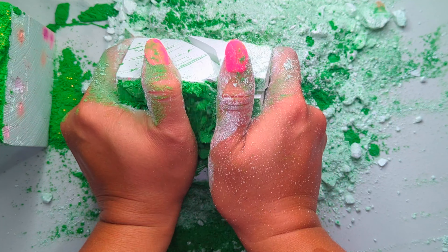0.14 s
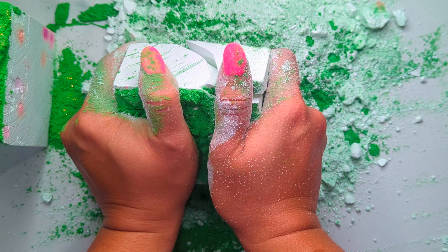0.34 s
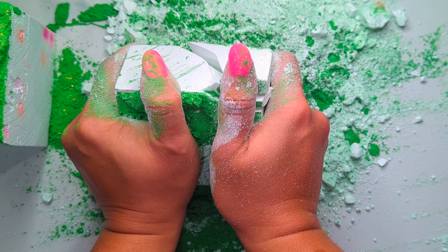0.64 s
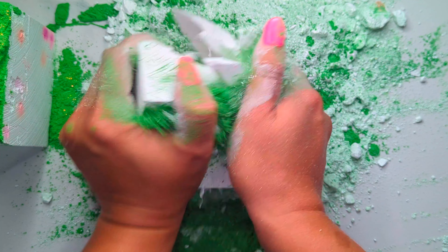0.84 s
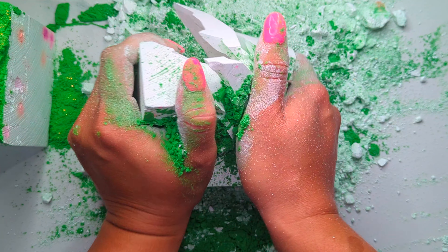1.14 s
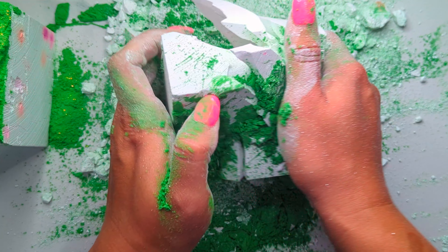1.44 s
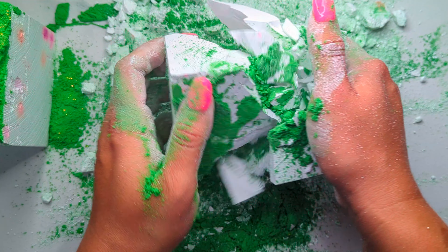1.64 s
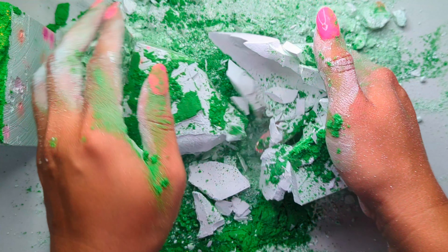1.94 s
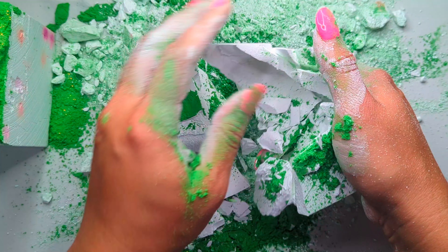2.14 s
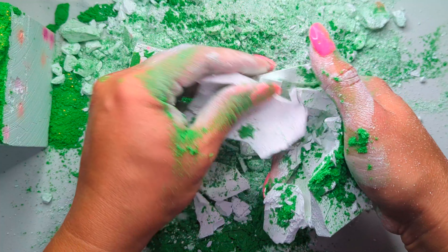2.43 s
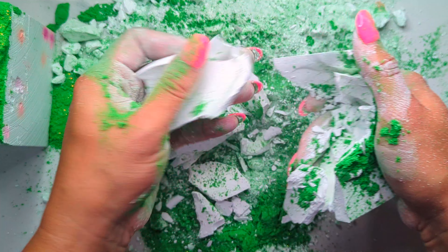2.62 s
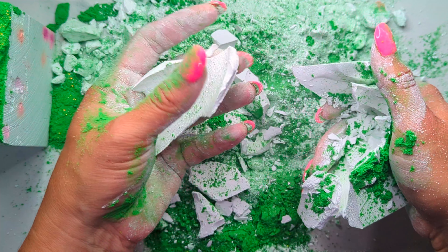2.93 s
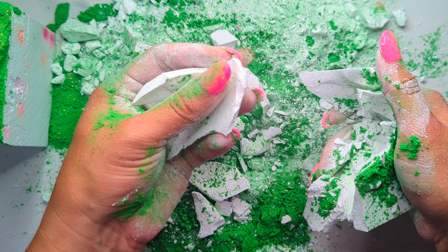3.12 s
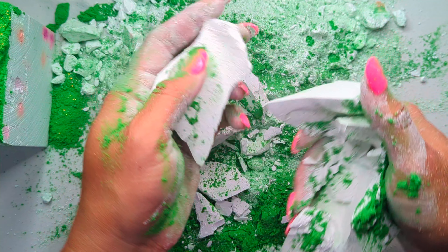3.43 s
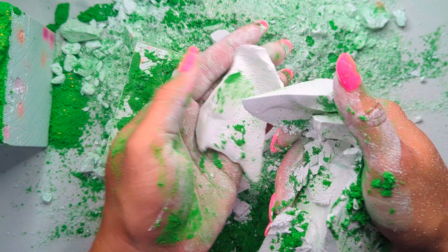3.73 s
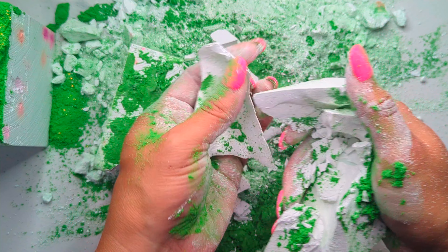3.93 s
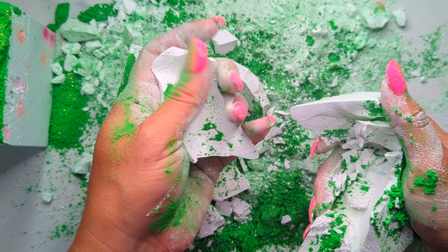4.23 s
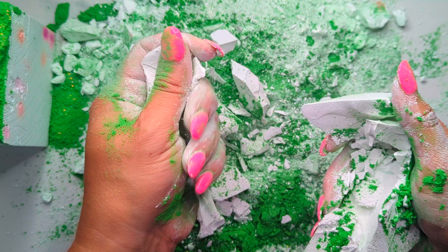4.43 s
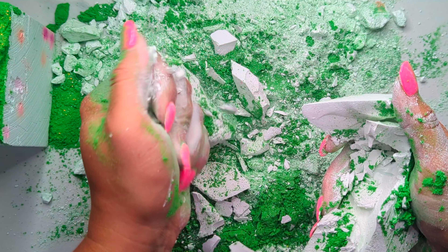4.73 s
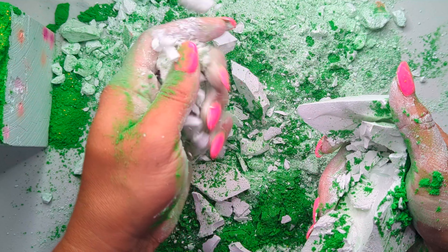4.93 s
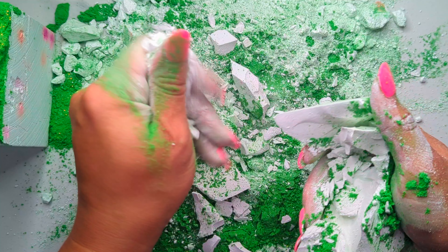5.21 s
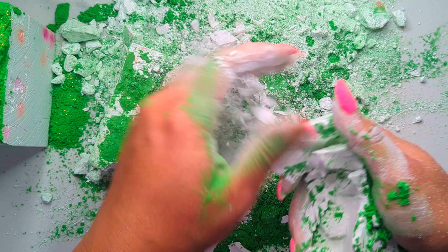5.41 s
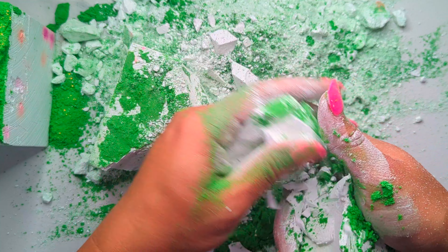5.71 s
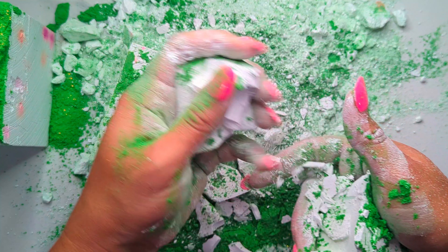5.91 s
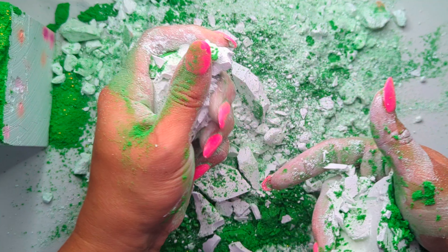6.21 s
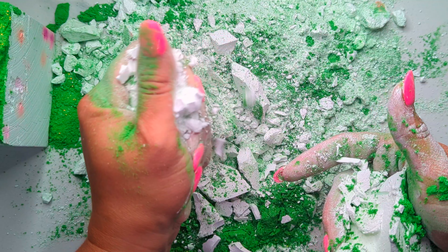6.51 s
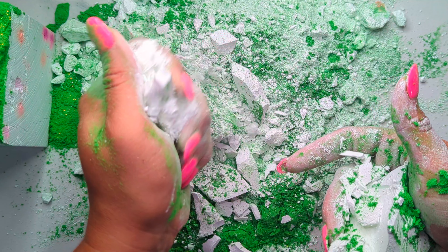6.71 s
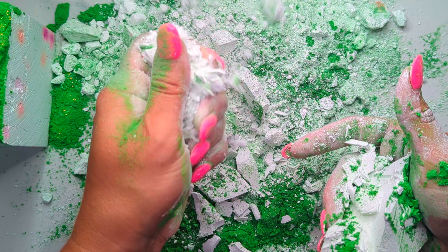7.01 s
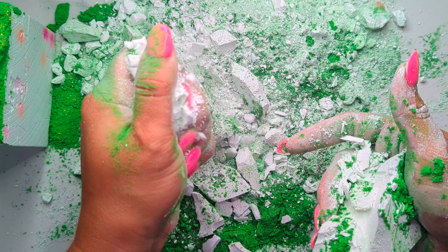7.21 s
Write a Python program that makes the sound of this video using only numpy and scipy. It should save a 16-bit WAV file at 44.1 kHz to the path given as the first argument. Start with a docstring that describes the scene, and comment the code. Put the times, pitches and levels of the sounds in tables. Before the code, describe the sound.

Three fractures of a chalky block open: a dry snap, a brighter one, then an overloaded boom-crack. Gritty dragging, clacks and crumbs follow, thinning to powdery strokes and small thumps. Loud brittle crunching breaks out as a piece is squeezed in the fist, shards clink and rattle, and a second, heavier crush crackles to the end. Close microphone, small room, low steady hum.

```python
"""A block of dry chalk is broken in two hands over a table, then crushed in one fist, very near a microphone.
Three long fractures snap it: each rings block and table, fills the small room and shoves the air.
Pieces crack or knock dully as short pitched noise bursts, crumbs grind as clicks, and dust rubs as soft hiss.
The half block drags on the table, lumps thump and shards clink as damped tones, over room air and a fan hum.
The loud cracks overload the microphone, so its input clips hard."""
import sys
import numpy as np
from scipy import signal
from scipy.fft import rfft, irfft
from scipy.io import wavfile

SR = 44100
rng = np.random.default_rng(int(sys.argv[2]) if len(sys.argv) > 2 else 0)


def pcm_store(signal):
    """Save signal as 16-bit PCM."""
    levels = np.round(np.clip(np.atleast_2d(signal), -1, 1) * 32767)
    wavfile.write(sys.argv[1], SR, levels.astype(np.int16).T)


N = 324135
TIME = np.arange(N) / SR
TAP_HZ = np.fft.rfftfreq(4096, 1 / SR)  # frequency grid of the colouring filters

# room air at the microphone, spectrum shape only: pitch_hz, gain_db
AIR_COLOUR = [(20, -6), (45, -9), (90, -12), (135, -12), (180, -19), (340, -18), (480, -26), (900, -30),
              (3000, -33), (7000, -37), (15500, -47)]
# a fan somewhere: pitch_hz, rms_level_db
FAN_HUM = [(119, -39.5), (173, -48.5), (217, -48), (356, -49)]
# the small room: pitch_hz, time_to_fall_60_db_s
ROOM_T60 = [(100, 0.6506), (600, 0.515), (2000, 0.5676), (5000, 0.46666), (9000, 0.42324), (15000, 0.2478)]

# pieces crack or knock dully on the table; more weight means more low end:
# start_s, level_db, decay_ms, pitch_hz, weight_db
CRACKS = [(0.149, -13, 2.022, 4875, -1), (0.4362, -22, 2.252, 1598, 7.5), (0.52, -18, 1.831, 1502, 19.5),
          (0.633, -20.5, 6.77, 2378, 7), (0.7864, -22.5, 6.486, 1717, 12.5), (1.1133, -7, 0.2876, 2305, -4),
          (1.5944, -19.5, 2.143, 2600, 15), (1.7255, -21.5, 1.404, 2201, -6),
          (1.8154, -16, 0.666, 1998, -6.5), (1.8324, -15, 8.835, 1997, 11), (1.8526, -9, 1.437, 2274, -14),
          (1.8921, -4, 2.162, 800, 6.5), (1.9039, -14.5, 7.17, 2276, 9), (1.991, -13.5, 1.295, 4862, -0.5),
          (2.0181, -17.5, 1.298, 2000, 4.5), (2.0312, -10.5, 0.7426, 4243, 1),
          (2.3874, -14.5, 5.013, 2760, 2), (2.4094, -16.5, 1.741, 3003, 1), (2.4486, -18.5, 2.904, 2200, 1),
          (2.5246, -11, 5.593, 3879, -0.5), (2.9378, -17, 1.255, 1363, 7.5),
          (2.976, -16.5, 0.6773, 2404, -14), (3.096, -13.5, 0.8562, 1300, 20),
          (3.1574, -14, 0.2938, 3805, -11.5), (4.071, -23.5, 3.078, 2982, -21),
          (4.2673, -14.5, 0.558, 5131, -1), (4.3774, -5, 3.216, 5031, -1),
          (4.411, -11.5, 0.846, 5908, -2.5), (4.4239, 4, 2.3295, 3140, -5), (4.4356, -2, 2.19, 3440, -0.5),
          (4.461, -2.5, 2.152, 3602, -9.5), (4.4678, 7, 2.07, 3799, -3.5), (4.4949, 2.5, 2.897, 4401, -12),
          (4.5262, -6.5, 1.89, 2603, -5), (4.5407, 1.5, 0.9355, 2366, -7), (4.6036, -12, 0.816, 1400, -6),
          (4.627, -0.5, 0.953, 3928, 1), (4.6301, -3.5, 1.512, 2351, -4.5),
          (4.6417, -10, 1.807, 2398, -5.5), (4.677, -5, 1.141, 3400, 0.5), (4.6834, -3.5, 1.062, 2471, 2.5),
          (4.6873, -4.5, 1.446, 3906, -1.5), (4.705, -3.5, 1.662, 3152, 1),
          (4.7295, -7.5, 0.7915, 3458, -13.5), (5.068, -17, 6.424, 4026, -4.5),
          (5.1544, -11.5, 5.874, 5065, 8.5), (5.16, -6, 0.561, 2697, -4.5), (5.191, -5, 0.7855, 2502, -5.5),
          (5.274, -8.5, 2.177, 3302, 6), (5.3078, -1, 0.4618, 2487, -12.5), (5.3128, -8, 2.017, 6140, 1.5),
          (5.354, -15.5, 3.573, 2746, 3), (5.4205, -19.5, 1.603, 3000, 25.5),
          (5.529, -6.5, 0.7, 1670, -11.5), (5.5477, -9, 1.879, 1886, -14), (6.0664, 2, 2.879, 3999, -4.5),
          (6.0985, -1, 1.834, 5690, -12), (6.1076, 4.5, 0.566, 2904, -2.5), (6.1115, 0, 3.02, 5457, -13.5),
          (6.1285, 1.5, 4.103, 4224, -0.5), (6.151, -8.5, 0.611, 3800, -1), (6.155, 3, 1.7315, 2494, -9.5),
          (6.175, -5, 2.462, 7063, -20), (6.196, -1, 1.924, 3989, -9.5), (6.2232, -3.5, 2.466, 2085, -7),
          (6.2289, -5, 1.895, 3997, -6), (6.245, 3.5, 4.913, 4066, -5.5), (6.3222, -12, 0.623, 4500, -10),
          (6.3841, -2.5, 4.226, 6770, -3), (6.4009, 4, 3.167, 2965, -9), (6.413, -0.5, 0.589, 3694, -3.5),
          (6.4468, -0.5, 2.773, 2694, -0.5), (6.4562, -6, 1.113, 3403, -10.5),
          (6.4659, 1, 0.704, 4224, -15.5), (6.4758, -7.5, 3.278, 2700, 3.5), (6.4902, 7, 3.566, 2710, 1),
          (6.5014, 2, 1.739, 2394, 1), (6.6188, -8.5, 1.716, 1939, -11), (6.7586, -12.5, 0.4795, 2200, 19),
          (6.766, -16.5, 6.05, 2401, -12), (6.8556, -13.5, 1.422, 3515, 6),
          (6.9189, -13, 1.817, 2689, -3.5), (6.9911, -3.5, 1.7393, 1718, -1.5),
          (7.0732, 1, 0.3672, 2681, -4), (7.117, -1.5, 0.514, 3896, -10.5),
          (7.1364, -.5, 0.5785, 1801, -21), (7.148, -10, 1.246, 1800, -10.5),
          (7.1725, 4.5, 0.375, 2130, -8), (7.188, -10, 0.5076, 3300, -2),
          (7.2261, -5.5, 0.6765, 3905, -3.5), (7.239, -2, 0.51, 1998, 3.5), (7.258, -2, 1.809, 4360, 2.5),
          (7.3163, -12, 0.8296, 2299, -7)]
# a cracking or knocking piece before its own pitch is added: pitch_hz, gain_db
CRACK_COLOUR = [(60, -21.5), (250, 1), (600, 0.5), (1200, -3), (2600, -3), (5000, -5.5), (7000, -0.5),
                (10000, -4), (16000, -15)]
# the whole block snaps: start_s, level_db, decay_ms, treble_lift_db, room_level_db, air_push_peak_db
SNAPS = [(0.1621, 8, 7.877, 1.5, -12.5, -6.5), (0.5751, 5, 5.628, 19, -21, -15.5),
         (0.8943, 20.5, 16, 4, -2.5, 3)]
# the snapping block before its modes are added: pitch_hz, gain_db
SNAP_COLOUR = [(40, -10), (140, -3), (240, -4.5), (380, -3), (600, -4), (1000, -5), (1800, -8),
               (3200, -14.5), (7000, -18), (11000, -23.5), (16000, -44)]
# what block and table ring with: pitch_hz, width_hz, gain_db
BLOCK_MODES = [(364, 35, -1), (475, 30, -4), (543, 25, 2), (620, 32, 2), (750, 25, -2), (806, 25, -2),
               (1050, 80, -6), (3030, 160, -2), (3700, 250, -5)]
# the half block dragged over the table, before the drag trim: time_s, level_db
DRAG_EFFORT = [(1.2, -49), (1.236, -45), (1.376, -33), (1.406, -41.5), (1.582, -40.5), (1.596, -31),
               (1.688, -39.5), (1.8, -37.5)]
# modes of the dragged half block: pitch_hz, width_hz, gain_db
DRAG_MODES = [(2344.5, 133.2, 3), (3382, 256, 0), (3841.5, 312.8, 3.5), (5513, 266, -4), (6423.3, 351.6, 0),
              (8517, 107.6, -0.5)]
# soft low thumps of lumps against palm or table, some beneath a crack:
# start_s, push_peak_db, nominal_pitch_hz (thump() lowers it)
THUMPS = [(1.488, -19.5, 118.1), (1.517, -17.5, 100.1), (1.722, -20.5, 119.7), (1.907, -14.5, 89),
          (1.943, -14.5, 99.9), (1.965, -14, 117.7), (2.326, -18, 107.9), (2.391, -10, 204.5),
          (2.832, -20, 78), (3.096, -18.5, 109.1), (3.118, -15, 143.4), (3.281, -19, 110),
          (3.499, -14.5, 98.41), (3.647, -18.5, 88), (3.807, -14.5, 191), (3.914, -19.5, 90.03),
          (3.978, -18.5, 150), (4.759, -18.5, 104.8), (4.938, -13.5, 151), (5.158, -10.5, 158.3),
          (5.295, -14, 121.3), (6.135, -10, 191.3), (6.916, -12, 165), (7.149, -16.5, 192.4)]
# crumbs pressed in the fist, one curve a squeeze, before the grit and powder trims: time_s, level_db
SQUEEZES = [
    [(1.76, -33), (1.866, -30), (1.942, -35), (2.066, -39), (2.14, -45.5)],
    [(4.38, -24), (4.44, -32), (4.552, -37), (4.604, -28), (4.83, -31.5), (4.98, -35)],
    [(5.0, -28), (5.08, -32), (5.386, -34), (5.45, -33), (5.61, -35.5), (5.72, -46.5)],
    [(6.07, -44.5), (6.118, -46.5), (6.238, -35), (6.298, -26), (6.456, -23.5), (6.564, -29.5),
     (6.7, -36.5)],
    [(6.72, -29), (6.816, -35), (7.084, -28.5), (7.35, -33.5)],
]
# ground crumbs: pitch_hz, gain_db
GRIT_COLOUR = [(150, -9.5), (500, 1), (1200, -6.5), (2700, -2.5), (4000, -6.5), (6500, -5.5), (10000, -8.5),
               (16000, -17)]
# fine powder: pitch_hz, gain_db
POWDER_COLOUR = [(200, 2.5), (1200, -7.5), (3000, 2.5), (5200, 1), (6700, 5.5), (9000, -2), (13000, -1),
                 (16000, -20)]
# dusty skin slides over chalk: middle_s, half_length_s, level_db (before the rub trim), coarseness_db
RUBS = [(2.284, 0.0114, -35, 1.5), (2.361, 0.02907, -34, 7), (2.506, 0.022, -33.5, 2),
        (2.736, 0.04084, -37, 2.5), (3.14, 0.0907, -42, -3.5), (3.311, 0.02775, -27.5, -2.5),
        (3.388, 0.05669, -32.5, -4), (3.506, 0.00763, -40, -1.5), (3.595, 0.01105, -36, -5),
        (3.672, 0.01367, -31.5, 0.5), (3.824, 0.07544, -42, -2.5), (3.957, 0.04706, -33.5, 6.5),
        (4.085, 0.03673, -39.5, 1), (4.209, 0.05847, -33.5, 1.5), (4.825, 0.05387, -31.5, 0.5),
        (5.392, 0.01796, -37, -22), (5.716, 0.01914, -40, -4), (5.85, 0.02131, -36, 4),
        (5.97, 0.05988, -40, 5.5), (7.092, 0.052, -34.5, 11)]
# shards knock together: start_s, level_db, rattle_decay_ms, brightness_db_per_octave
CLINKS = [(2.4611, -14.5, 4.423, 0), (2.4663, -6.5, 2.689, 7.5), (2.476, -15.5, 5.61, 0),
          (2.536, -18.5, 5.04, 3.5), (2.572, -30, 2.03, 2.5), (3.67, -29.5, 11.51, 3),
          (5.2194, -28, 3.356, 6.5), (5.2386, -16.5, 1.295, 3.5), (5.3592, -21.5, 2.916, 4.5),
          (5.4421, -30.5, 6.23, 14.5), (5.459, -18.5, 1.326, -11), (5.472, -6, 0.811, -0.5),
          (5.4915, -22, 3.576, 7.5), (5.5196, -13.5, 3, -2.5), (5.557, -17, 1.506, -6),
          (5.5926, -7, 1.714, -5), (5.888, -21, 4.24, -0.5)]
# nominal modes of a flat shard, before each shard's own detuning: pitch_hz
SHARD_HZ = [2480, 3080, 3300, 4750, 6540, 8280]
# one row for each shard mode, before tilt and scatter: level_db, time_to_fall_60_db_s
SHARD_RING = [(-21, 0.01737), (2.5, 0.02157), (-16.5, 0.0128), (-6.5, 0.04098), (-12.5, 0.0349),
              (-8.5, 0.03605)]
# the two shards rattle: pitch_hz, gain_db
RATTLE_COLOUR = [(300, -4), (1300, -3.5), (2800, 7), (4000, -9), (6000, 3.5), (8400, -5), (10000, -8),
                 (16000, -38)]

CRACK_RING_DB, CRACK_RING_OCTAVES = 5.5, 0.9603  # the broad peak at a piece's own pitch
EDGE_DB, EDGE_DB_PER_OCTAVE, MIDDLE_PIECE_HZ = -10, 10, 3176  # higher-pitched pieces have a sharper edge
SPRAY_DB, SPRAY_STRETCH = -12.5, 2.9616  # crumbs that fly off: level, and how many times longer they last
# the low bump beneath each crack or knock; its nominal pitch is lowered in thump()
BUMP_DB, BUMP_NOMINAL_HZ = -12.5, 126.97
BUMP_PER_WEIGHT, FULL_WEIGHT_DB, BUMP_DB_PER_TENFOLD_DECAY = 0.6935, 9.5, 11.5

BLOCK_RING_DB, BLOCK_T60_S = -7.5, 0.3255  # the ring after a snap, relative to its room level
FLYING_DUST_DB = -27  # powder that sprays from a snap and hisses in its tail
SWAY_HZ = 11.5  # the microphone on its stand

CHIP_LAG_S, CHIP_DROP_DB = .024, -17.5  # a chip follows each crack: longest lag, level relative to the crack
FALLING_CHIPS, FALL_S, FALL_DB = 3, (.03, .12), -21  # chips after each snap: count, earliest and latest, level
CHIPS_PER_S, CHIP_OVER_GRIT_DB = 22, 13.5  # chips while the fist presses, relative to the squeeze curve
CHIP_HZ, CHIP_SPREAD_OCTAVES = 2825, 0.6096  # middle pitch and its scatter either way
CHIP_DECAY_MS, CHIP_SPREAD_DB = 0.7852, 3  # middle decay (scattered an octave), level scatter either way
CHIP_RING_DB, CHIP_RING_OCTAVES = 9.5, 0.5408  # a chip's pitch is clearer than a big piece's

DRAG_TRIM_DB, DRAG_RELEASE_DB_PER_S = 1.5, 62  # it slides on and comes to rest
GRIP_DB_PER_S, LET_GO_DB_PER_S = 6000, 180  # how fast a squeeze takes hold and lets go
GRIT_DB, SQUEEZED_POWDER_DB = -2, -13  # grit and powder hiss both follow the pressure
SHARD_DETUNE = .011  # no two shards ring alike (rms fraction of pitch)
EDGE_HZ = 16100  # upper band limit


def amp(db):
    """Turns dB into gain."""
    return 10 ** (np.asarray(db) / 20)


def unit(x):
    """Scales to rms 1."""
    return x / np.sqrt(np.mean(x ** 2) + 1e-20)


def read(points, hz):
    """Reads a (pitch_hz, value) table on a log-frequency axis."""
    f, value = np.transpose(points)
    return np.interp(np.log(hz + 1), np.log(f + 1), value)


def add(mix, start_s, sound):
    """Lays a sound into the mix in place, cut off at the end."""
    part = mix[max(round(start_s * SR), 0):][:len(sound)]
    part += sound[:len(part)]


def colour(x, gain_db):
    """Causal minimum-phase filter (gain on TAP_HZ) that keeps the power of white noise."""
    log_gain = np.log(amp(np.r_[gain_db, gain_db[-2:0:-1]]))
    spectrum = np.exp(np.conj(signal.hilbert(log_gain)))
    taps = np.fft.ifft(spectrum).real[:len(gain_db)]
    return signal.fftconvolve(x, taps / np.linalg.norm(taps))[:len(x)]


def shelf(corner_hz):
    """Rises on TAP_HZ from 0 below the corner to 1 above it."""
    return 1 / (1 + (corner_hz / (TAP_HZ + 1)) ** 4)


def resonances(modes):
    """Summed gain of (pitch_hz, width_hz, gain_db) peaks on TAP_HZ."""
    return sum(amp(db) / (1 + (2 * (TAP_HZ - hz) / width_hz) ** 2) for hz, width_hz, db in modes)


def drift(cutoff_hz):
    """Slow random wander of rms 1: noise under a Gaussian low-pass."""
    spectrum = rfft(rng.standard_normal(N))
    hz = np.fft.rfftfreq(N, 1 / SR)
    return unit(irfft(spectrum * np.exp(-(hz / cutoff_hz) ** 2), N))


def grains(per_s, spread_db):
    """Random clicks of rms 1, mostly small and a few large."""
    sizes = amp(spread_db * np.minimum(rng.exponential(1, N), 4.5))
    signs = rng.choice([-1, 1], N)
    return unit(sizes * signs * (rng.random(N) < per_s / SR))


def mottle(x, patchy_db):
    """Random patches of louder and softer colour in time and pitch keep the noise uneven; rms 1."""
    z = signal.stft(x, SR, nperseg=512)[2]
    patch_shape = np.outer(np.hanning(12), np.hanning(14))
    patches = signal.fftconvolve(rng.standard_normal(z.shape), patch_shape, "same")
    return unit(signal.istft(z * amp(patchy_db * unit(patches)), SR, nperseg=512)[1][:N])


def avalanche(decay_ms, gain_db, spread):
    """A fracture: tiny ruptures of uneven size that die away; it starts near rms 1."""
    t = np.arange(int(SR * (decay_ms / 125 + .01))) / SR
    fade = np.exp(-t * 1000 / decay_ms)
    held_chance = np.repeat(rng.standard_normal(len(t)), 16)[:len(t)]  # each size lasts 16 samples
    ruptures = rng.standard_normal(len(t)) * np.exp(spread * held_chance) * fade
    burst = colour(ruptures, gain_db)
    return burst * np.linalg.norm(fade) / np.linalg.norm(burst)


def push(hz, damping):
    """A shove of air, peak 1: a sharp front, then a heavily damped swing back."""
    turns = np.arange(int(4 * SR / hz)) * hz / SR
    front = 1 - np.exp(-turns / 0.10903)
    swing = np.cos(2 * np.pi * turns) * np.exp(-damping * turns) * front
    return swing / abs(swing).max()


def die_away(x):
    """Lets each band fade as it does in the room; the highest treble dies first."""
    hz, t, z = signal.stft(x, SR, nperseg=256)
    decay_db = -60 * t / read(ROOM_T60, hz)[:, None]
    return signal.istft(z * amp(decay_db), SR, nperseg=256)[1]


def room(x):
    """Sparse room reflections of random sign, the first after 4 ms."""
    signs = rng.choice([-1., 1.], SR)
    reflections = signs * (rng.random(SR) < .15) * (TIME[:SR] > .004)
    tail = die_away(reflections)
    return signal.fftconvolve(x, tail / np.linalg.norm(tail))[:N]


def fracture(db, decay_ms, hz, weight_db, peak_db, peak_octaves):
    """A piece cracks or knocks with its own pitch, and a short spray of crumbs follows."""
    ring_db = peak_db * np.exp(-(np.log2((TAP_HZ + 1) / hz) / peak_octaves) ** 2)
    low_db = weight_db * (1 - shelf(1079))
    edge_db = EDGE_DB + EDGE_DB_PER_OCTAVE * np.log2(hz / MIDDLE_PIECE_HZ)
    tone_db = read(CRACK_COLOUR, TAP_HZ) + ring_db + low_db + edge_db * shelf(6695.7)
    sound = amp(SPRAY_DB) * avalanche(SPRAY_STRETCH * decay_ms, tone_db, spread=0.9285)
    add(sound, 0, avalanche(decay_ms, tone_db, spread=0.1841))
    return amp(db) * sound


def thump(db, nominal_hz):
    """A soft knock: a damped push of air with a dull scuff of noise."""
    sound = np.zeros(SR // 4)
    add(sound, 0, push(nominal_hz * 0.75005, damping=2.841))
    scuff_db = -28 * shelf(418.84) - 14 * shelf(3485)
    add(sound, 0, amp(-5) * avalanche(6.394, scuff_db, spread=1.0))
    return amp(db) * sound


def pressure():
    """How hard the fist bears on the crumbs, as a gain: the strongest squeeze at each moment."""
    level_db = np.full(N, -100.)
    for rows in SQUEEZES:
        s, db = np.transpose(rows)
        grip_db = GRIP_DB_PER_S * np.maximum(s[0] - TIME, 0)
        let_go_db = LET_GO_DB_PER_S * np.maximum(TIME - s[-1], 0)
        level_db = np.maximum(level_db, np.interp(TIME, s, db) - grip_db - let_go_db)
    return amp(level_db)


def background():
    """Room air as coloured noise, and a fan hum of sines with wavering phase."""
    air = unit(colour(rng.standard_normal(N), read(AIR_COLOUR, TAP_HZ)))
    hum = np.zeros(N)
    for hz, db in FAN_HUM:
        phase = 2 * np.pi * hz * TIME + 1.0985 * drift(4.099)
        hum += amp(db) * np.sqrt(2) * np.sin(phase)
    return amp(-36.0) * air + hum


def cracks():
    """Pieces crack or knock dully on the table; heavier or longer ones carry a stronger low bump."""
    out = np.zeros(N)
    for s, db, decay_ms, hz, weight_db in CRACKS:
        add(out, s, fracture(db, decay_ms, hz, weight_db, CRACK_RING_DB, CRACK_RING_OCTAVES))
        weight_bump_db = BUMP_PER_WEIGHT * min(weight_db, FULL_WEIGHT_DB)
        length_bump_db = BUMP_DB_PER_TENFOLD_DECAY * np.log10(decay_ms / 2)
        add(out, s, thump(db + BUMP_DB + weight_bump_db + length_bump_db, BUMP_NOMINAL_HZ))
    return out


def chips():
    """Small chips come away by chance: after each crack or knock, after each snap, and as the fist presses."""
    out, pressure_db = np.zeros(N), 20 * np.log10(pressure())
    after = [(s + CHIP_LAG_S * rng.uniform(.2, 1), db + CHIP_DROP_DB) for s, db, *_ in CRACKS]
    fallen = [(s + rng.uniform(*FALL_S), FALL_DB) for s, *_ in SNAPS for _ in range(FALLING_CHIPS)]
    moments = np.flatnonzero(rng.random(N) < CHIPS_PER_S / SR)
    pressed = [(TIME[i], pressure_db[i] + CHIP_OVER_GRIT_DB) for i in moments]
    for s, db in after + fallen + pressed:
        strength, length, size = rng.uniform(-1, 1, 3)
        level_db = db + CHIP_SPREAD_DB * strength
        decay_ms = CHIP_DECAY_MS * 2 ** length
        hz = CHIP_HZ * 2 ** (CHIP_SPREAD_OCTAVES * size)
        add(out, s, fracture(level_db, decay_ms, hz, 1.406, CHIP_RING_DB, CHIP_RING_OCTAVES))
    return out


def snaps():
    """The block parts: a long fracture rings block and table, fills the room, and the halves shove the air."""
    out, t = np.zeros(N), TIME[:2 * SR]
    body_db = read(SNAP_COLOUR, TAP_HZ) + 20 * np.log10(1 + resonances(BLOCK_MODES))
    powder_db = read(POWDER_COLOUR, TAP_HZ)
    for s, db, decay_ms, lift_db, room_db, push_db in SNAPS:
        tone_db = body_db + lift_db * shelf(2556.3)
        add(out, s, amp(db) * avalanche(decay_ms, tone_db, spread=0.6113))

        debris = grains(per_s=12000, spread_db=2.6)[:SR]
        add(out, s, amp(room_db) * die_away(colour(debris, tone_db)))
        dust = grains(per_s=5100, spread_db=2)[:SR]
        add(out, s, amp(FLYING_DUST_DB) * die_away(colour(dust, powder_db)))

        ring = np.zeros(len(t))
        for hz, _, mode_db in BLOCK_MODES:
            if hz < 900:  # only the low modes last
                ring += amp(mode_db) * np.sin(2 * np.pi * (hz * t + rng.random()))
        ring_db = room_db + BLOCK_RING_DB - lift_db / 2
        add(out, s, amp(ring_db) * ring * np.exp(-np.log(1000) * t / BLOCK_T60_S))

        add(out, s + 1.85 * decay_ms / 1000, -amp(push_db) * push(61.17, damping=1.7325))
        sway = np.sin(2 * np.pi * SWAY_HZ * t) * np.exp(-t / 0.6045)
        add(out, s, amp(db / 2 - 25) * sway)  # the jolt leaves the microphone swaying
    return out


def dragging():
    """Grit under the sliding half block sticks and slips, as dense clicks, and sounds its modes."""
    modes = resonances(DRAG_MODES)
    tone_db = 20 * np.log10(amp(-7) + modes / modes.max()) - 7 * shelf(10000)
    scrape = mottle(colour(grains(per_s=9000, spread_db=2.6), tone_db), patchy_db=3.2)
    effort_db = np.interp(TIME, *np.transpose(DRAG_EFFORT), left=-100)
    release_db = DRAG_RELEASE_DB_PER_S * np.maximum(TIME - DRAG_EFFORT[-1][0], 0)
    return amp(DRAG_TRIM_DB + effort_db - release_db + 1.121 * drift(30.34)) * scrape


def thumps():
    """Soft low thumps of lumps against palm or table, some beneath a crack."""
    out = np.zeros(N)
    for s, db, nominal_hz in THUMPS:
        add(out, s, thump(db, nominal_hz))
    return out


def grinding():
    """Crumbs pop one by one, each size at its own pitch, in a wavering level; powder hisses between them."""
    base_db = read(GRIT_COLOUR, TAP_HZ)
    crumbs = np.zeros(N)
    for hz in np.geomspace(1300, 8000, 8):
        pitch_db = 13 * np.exp(-(np.log2((TAP_HZ + 1) / hz) / .35) ** 2)
        crumbs += colour(grains(per_s=90, spread_db=4.5), base_db + pitch_db)
    dust = mottle(colour(grains(per_s=7000, spread_db=3), base_db), patchy_db=3)
    powder = colour(grains(per_s=12000, spread_db=3.2), read(POWDER_COLOUR, TAP_HZ))
    clumping_db = 3.6766 * drift(39.33) - 2.5
    grit = amp(GRIT_DB + clumping_db) * (unit(crumbs) + dust / np.sqrt(2))
    return pressure() * (grit + amp(SQUEEZED_POWDER_DB) * powder)


def rubbing():
    """Fine powder hisses between skin and chalk in separate strokes; coarser dust adds a lower rasp."""
    out = np.zeros(N)
    powder = mottle(grains(per_s=12000, spread_db=3.2), patchy_db=2.6) * amp(1.4 * drift(70))
    for middle_s, half_s, db, coarse_db in RUBS:
        near = abs(TIME - middle_s) < 2 * half_s
        stroke = np.exp(-abs((TIME[near] - middle_s) / half_s) ** 3 / 2)
        tone_db = read(POWDER_COLOUR, TAP_HZ) + coarse_db * (1 - shelf(4196))
        add(out, middle_s - 2 * half_s, amp(db + 1.5) * stroke * colour(powder[near], tone_db))
    return out


def clinks():
    """A short rattle and the ring of two flat shards; a harder contact favours the higher modes."""
    out, t = np.zeros(N), TIME[:SR // 10]
    for s, db, rattle_ms, tilt_db in CLINKS:
        ring = np.zeros(len(t))
        for hz, (mode_db, t60_s) in 2 * list(zip(SHARD_HZ, SHARD_RING)):  # two shards
            strike_db = mode_db + tilt_db * np.log2(hz / 4000) + 2 * rng.standard_normal()
            own_hz = hz * (1 + SHARD_DETUNE * rng.standard_normal())
            ring += amp(strike_db - 60 * t / t60_s) * np.sin(2 * np.pi * (own_hz * t + rng.random()))
        add(out, s, amp(db - 4.0) * ring)
        tone_db = read(RATTLE_COLOUR, TAP_HZ) + tilt_db * np.log2(np.clip(TAP_HZ, 2000, 9000))
        add(out, s, amp(db) * avalanche(rattle_ms, tone_db - tone_db.max(), spread=0.3966))
    return out


def scene():
    """The close sounds of the hands with their room reflections, the snaps with their own tails, and the air."""
    hands = cracks() + chips() + dragging() + thumps() + grinding() + rubbing() + clinks()
    return (background() + snaps() + hands + amp(-19.5) * room(hands))[None]


def record(dry):
    """The microphone input clips hard; then the band limit takes off the top."""
    clipped = np.clip(dry, -1, 1)
    band_limit = signal.firwin(511, EDGE_HZ, window=("kaiser", 7), fs=SR)
    return signal.oaconvolve(clipped, band_limit[None], "same")


dry = scene()
out = record(dry)
pcm_store(out)
```